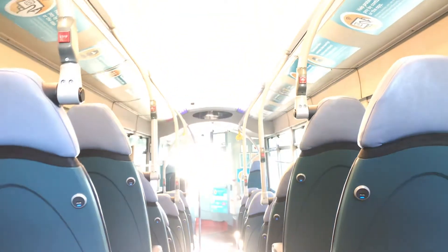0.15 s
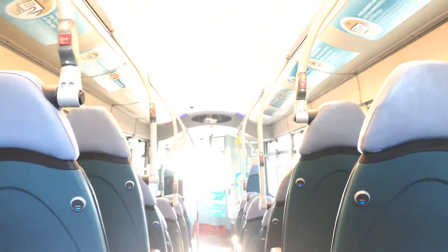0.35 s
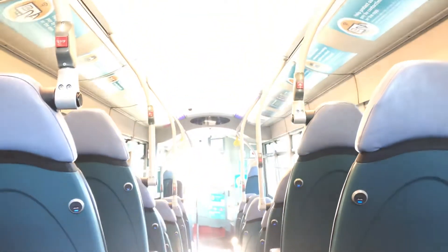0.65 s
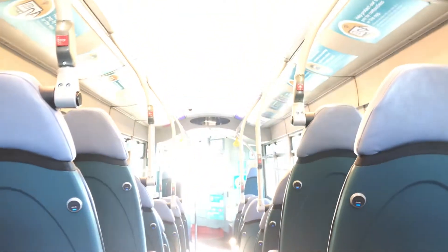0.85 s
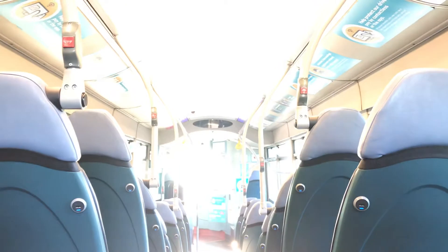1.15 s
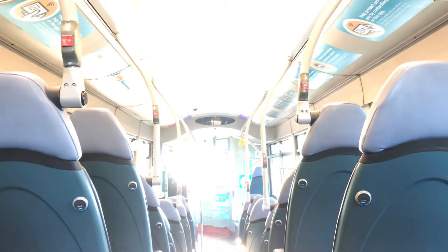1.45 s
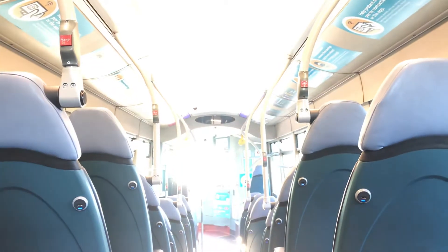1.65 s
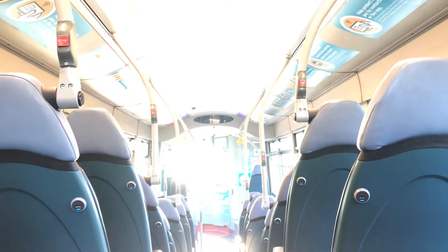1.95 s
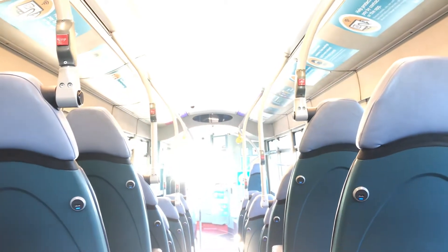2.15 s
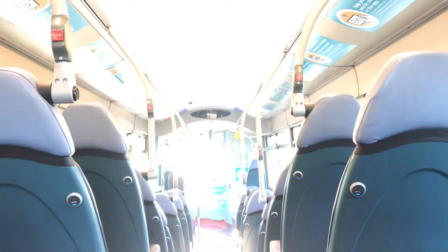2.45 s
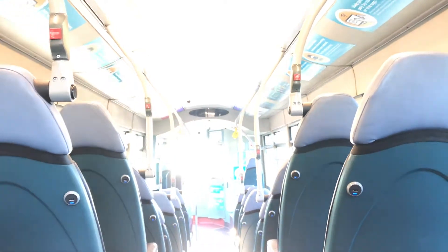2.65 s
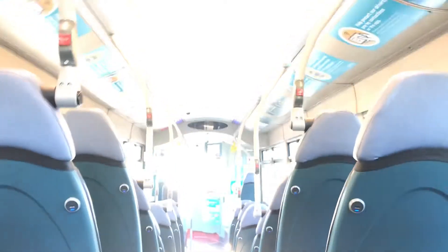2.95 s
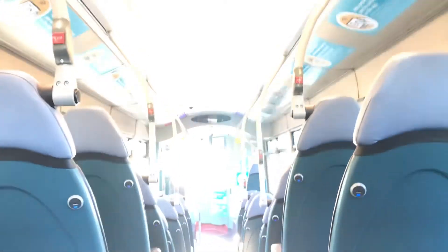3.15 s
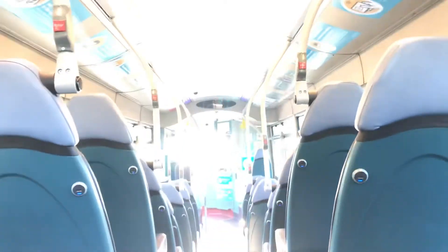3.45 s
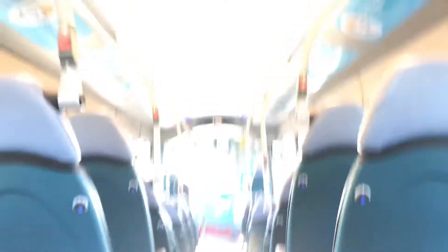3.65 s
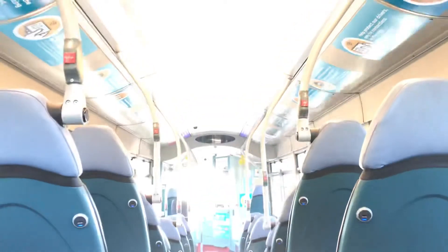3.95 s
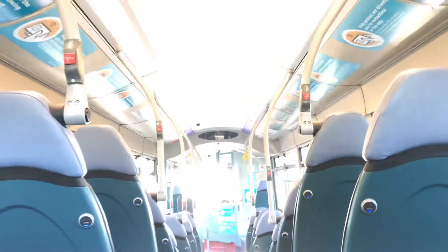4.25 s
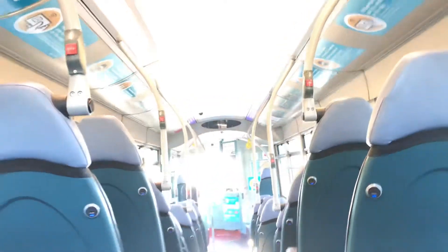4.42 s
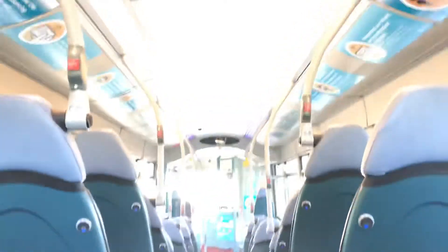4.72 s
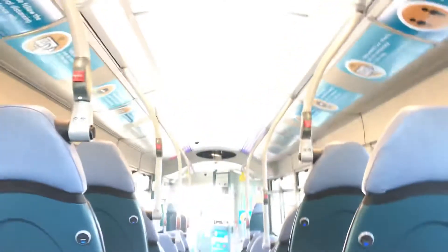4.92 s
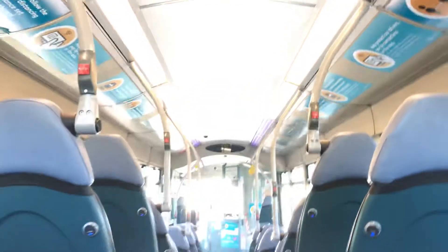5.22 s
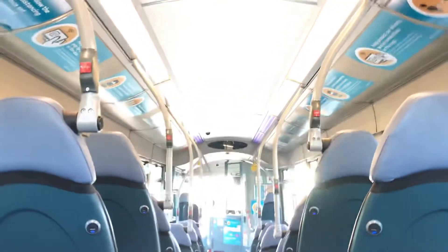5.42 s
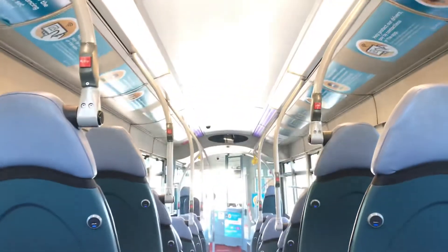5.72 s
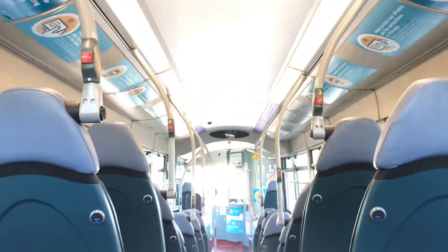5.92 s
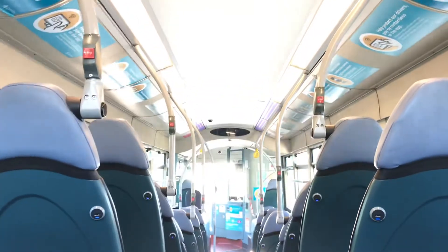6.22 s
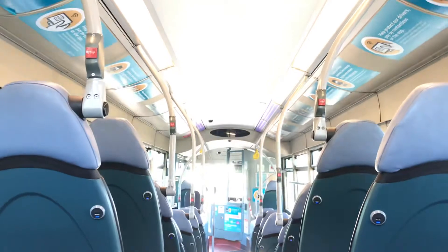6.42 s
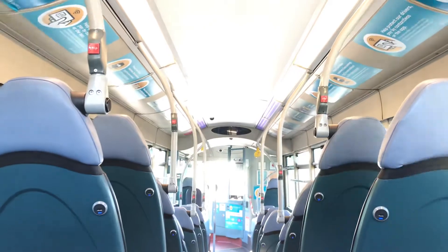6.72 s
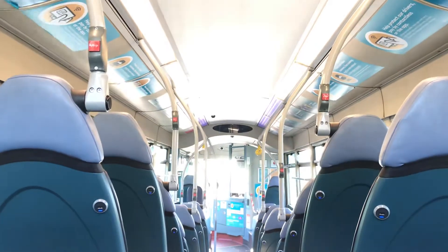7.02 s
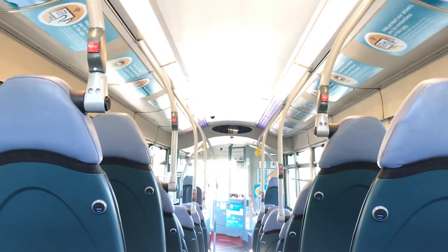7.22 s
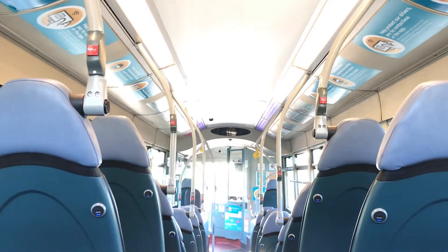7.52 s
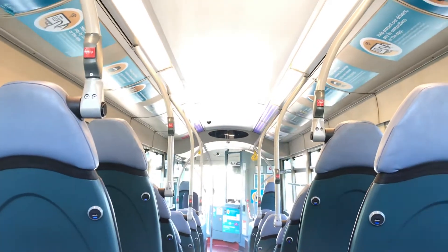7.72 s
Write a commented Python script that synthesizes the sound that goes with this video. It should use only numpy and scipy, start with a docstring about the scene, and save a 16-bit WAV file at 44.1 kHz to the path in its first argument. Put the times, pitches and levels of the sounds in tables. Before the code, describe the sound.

Heard from a seat near the rear of a bus cabin, a six-cylinder diesel eases down while its fluttering turbo whistle falls. Around two and a half seconds a bump thuds, fittings clack and a short squeak sounds. Then the engine takes load, the whistle soars into the high treble, and rushing air and thin singing tones join the drone and road rumble until the end.

```python
"""City bus pulling away

One microphone at a seat inside, near the rear; its chain cuts the treble just below 16 kHz.
The six-cylinder diesel coasts down, then pulls away under load: boom, knocks, hums and clatter follow its firing.
The turbocharger winds down and spools up; its speed sets the whistle, the blade tone, the rush of air
and two small gaps that sing under boost. Gear teeth whine in spells, shaped noise makes the road rumble,
and cabin fittings rattle, as noisy ticks and rings, over a few bumps."""
import sys
import numpy as np
from scipy import signal
from scipy.fft import rfft, irfft, next_fast_len
from scipy.io import wavfile
from scipy.ndimage import uniform_filter1d

SR = 44100
rng = np.random.default_rng(int(sys.argv[2]) if len(sys.argv) > 2 else 0)


def pcm_store(signal):
    """Save signal as 16-bit PCM."""
    levels = np.round(np.clip(np.atleast_2d(signal), -1, 1) * 32767)
    wavfile.write(sys.argv[1], SR, levels.astype(np.int16).T)


N = 347067
TIME = np.arange(N) / SR

# engine speed: (time [s], firing rate [Hz])
ENGINE_SPEED = [(0, 60.13), (0.5, 59.93), (1.3, 57.42), (2, 53.71), (2.8, 51.7), (4, 52.15), (4.6, 53.72),
                (5.5, 55.71), (6.5, 60.1), (7.3, 62.91), (7.87, 64.1)]
# how hard the engine works: (time [s], effort [dB])
ENGINE_EFFORT = [(0, 0), (1.7, -3.5), (2.3, -1), (2.58, 1.5), (2.78, 0.5), (2.97, 1), (3.8, 1.6), (4.6, 4),
                 (5.2, 0.5), (6.2, 0), (7.87, 0.5)]
# cabin boom at the firing rate: (time [s], level before the trim in engine() [dB])
BOOM_LEVEL = [(0, -21), (0.6, -33.5), (1.6, -55), (2.65, -34), (2.95, -19.5), (3.6, -28), (4.28, -21.5),
              (4.38, -16), (4.55, -20.5), (5.05, -17.5), (5.8, -15), (6.6, -16.5), (7.35, -13.5),
              (7.87, -18.5)]
# a pump driven by the engine takes up load and throbs, then slowly eases:
# (time [s], level before the trim in engine() [dB])
PUMP_LOADS = [(0, -19.5), (6.75, -21)]
PUMP_RISE_S, PUMP_T60_S, PUMP_FLOOR_DB = 0.077, 9.7, -38.5
# the six cylinders: (relative knock strength [dB])
CYLINDER_STRENGTH = [-2.5, -3.5, 0, -4, -2.5, -4]
# colour of the knocks in floor and body panels: (frequency [Hz], relative level [dB])
DRONE_COLOUR = [(50, -18), (75, -11.5), (100, -1), (122, -2.5), (136, -11), (160, 5), (190, -3.5),
                (235, -5.5), (295, -3), (350, -10.5), (450, -13.5), (600, -46.5), (1000, -52), (2000, -51)]
# colour of combustion and valve noise: (frequency [Hz], relative level [dB])
CLATTER_COLOUR = [(200, -19), (400, 3), (620, 1), (850, 3), (1100, -2.5), (1700, -2.5), (2100, -7),
                  (3200, -10), (4500, -15.5), (6500, -21.5), (8500, -35), (16000, -32)]
# levels at zero effort; the drone gains DRONE_PER_EFFORT dB per dB of effort
DRONE_DB, DRONE_PER_EFFORT, CLATTER_DB = -29.5, 0.71, -38
# engine orders that hum in the cabin:
# (time [s], half length [s], multiple of the crank rate [-], level [dB])
HUMS = [(1.099, 0.49, 11.25, -37.5), (3.699, 0.51, 9.5, -33), (3.698, 0.42, 10.5, -36),
        (4.9, 0.25, 10.5, -33), (5.7, 0.23, 10.5, -35), (5.4, .3, 12.5, -38.5), (6.2, 0.253, 8, -34),
        (7.45, 0.38, 8, -31.5), (7.498, 0.56, 9, -34), (7.495, .45, 16, -37.5)]

# turbo speed: (time [s], blade-passing rate [Hz])
TURBO_SPEED = [(0, 4096), (.3, 3720), (.65, 3317), (1, 3150), (1.5, 2810), (2.75, 3170), (2.9, 3304),
               (3.1, 4190), (3.5, 5560), (4, 7204), (4.5, 8640), (5, 9740), (5.5, 10390), (5.95, 11100),
               (6.4, 11470), (6.85, 11680), (7.1, 11590), (7.4, 11380), (7.65, 10850), (7.86, 10270)]
FULL_BOOST_HZ = 11700  # blade-passing rate
# states of the flow through the compressor, from easing off and stalling to pulling hard and unloading:
# (start [s], change-over [s], whistle pitch as a share of the blade rate [-], whistle [dB],
#  pitch unsteadiness as a share [-], undertone [dB], overtones [dB], breath [dB], slower cell [dB],
#  pull of the duct [0-1], throb [0-1], rush of air [dB]); levels relative
FLOW_STATES = [(0, .01, 0.82, 3, .03, -10, -18, -12, 0, 0.31, 0.3, 2),
               (.18, .12, 0.8, 0, .036, -14, -13, -4, -3, 0.16, 0.24, 1),
               (.56, .04, 0.82, 0.5, .022, -14, -27, -9, 4, 0.04, 0.3, -1.5),
               (.73, 0.029, 0.79, -0.5, .012, -11, -31, -14, -14, 0.03, 0.87, 1),
               (1, .05, 0.75, 0, 0.032, -12, -18, -4, -6, 0, 0.47, 0),
               (1.17, .2, 0.71, -8, .04, -14, -18, 0, -6, 0.03, 0.02, 3),
               (2.8, .06, 0.78, 2, .008, -12, -20, -14, -18, 0.04, .2, 0),
               (2.91, .02, 0.78, 3.5, 0.027, -18, -18, 4, -9, .3, 0.3, 0),
               (3, 0.066, .805, 4.5, 0.022, -20, -24, -12, -10, 0.7, 0.25, 0),
               (3.17, .06, 0.81, 2, 0.0157, -19, -15, -15, -12, .8, 0.13, 1),
               (3.42, 0.054, .8, -1.5, 0.0162, -16, -10.5, -12, -9, 0.7, 0.12, 4),
               (3.9, .15, .798, 3, 0.017, -18, -22, -25, -14, .6, 0.16, 6),
               (4.38, 0.072, 0.8, 2, 0.0125, -13, -22, -21, -16, .5, 0.23, 4),
               (4.76, 0.043, .797, 6.5, 0.0095, -20, -22, -28, -22, 0.6, 0.17, 0),
               (4.88, 0.117, 0.79, 0, .014, -14, -21, -22, -15, 0.87, 0.23, -2),
               (5.06, 0.12, 0.79, -3.5, .022, -15, -11, 0, -8, .5, 0.1, 2),
               (5.24, .15, .803, -2.5, 0.037, -14, -12, 3, -9, 0.36, 0.08, 3),
               (5.535, 0.0075, 0.81, 0, 0.0057, -16, -25, -24, -24, .8, 0.23, -3.5),
               (5.88, 0.031, 0.77, -11, .011, -7, -13, -13, -24, 0.02, 0.22, -4),
               (6.03, 0.15, 0.78, -5.5, 0.0085, -8.5, -17, -8, -22, 0, .12, -2.5),
               (7.36, 0.23, 0.78, -8, 0.0076, -12, -20, -17, -23, 0.03, .2, -4)]
# overtones of the whistle: (multiple of its pitch [-], relative level [dB])
WHISTLE_PARTIALS = [(1.5, 2), (2, 0), (2.5, -8)]
# base levels at full boost, to which the flow state adds; both fall at lower turbo speed
WHISTLE_DB, WHISTLE_DB_PER_OCTAVE = -33, 10
AIR_DB, AIR_DB_PER_OCTAVE = -46.5, 7.5
MUFFLE_HZ, MUFFLE_DB_PER_OCTAVE = 13500, 28  # the engine cover holds back the highest overtones
DUCT_SPACING_HZ = 340  # between the resonances of the intake duct
# the intake duct passes the blade tone best near one resonance:
# (blade rate [Hz], level before the trim in turbocharger() [dB])
BLADE_DUCT = [(8500, -82), (9700, -55), (10450, -58), (10850, -55), (11080, -39.5), (11450, -50),
              (11700, -46)]
# two gaps that sing under boost, swelling in turn: (time [s], level [dB])
LOW_LEAK_LEVEL = [(5.2, -56), (5.8, -53.5), (6.3, -53.5), (6.55, -45), (6.8, -46), (7.1, -44.5),
                  (7.27, -46.5), (7.38, -51), (7.46, -44.5), (7.6, -57), (7.87, -52)]
HIGH_LEAK_LEVEL = [(4.5, -51), (4.9, -50.5), (5.55, -47.5), (5.83, -50), (6, -48.5), (6.35, -42),
                   (6.68, -54), (6.87, -45), (7.25, -42.5), (7.38, -51), (7.53, -45.5), (7.87, -43)]
# their partials at full boost: (frequency [Hz], relative level [dB])
LOW_LEAK_PARTIALS = [(1436, -4), (2872, -0.5), (5744, -12)]
HIGH_LEAK_PARTIALS = [(1631, -5), (3262, -2.5), (6524, -18)]
LOW_LEAK_SAG, HIGH_LEAK_SAG = .28, .1  # octaves of pitch lost per octave of turbo speed gained
BOOST_LAG_S = 0.15  # pressure at the gaps follows the wheel this much later
# air seeps through the gaps as a narrow hiss: (time [s], half length [s], frequency [Hz], level [dB])
SEEPS = [(3.3, .18, 6330, -53), (3.953, 0.47, 6920, -53)]
SEEP_RATE_HZ = 660  # how fast the seeping air wavers, which sets the width of its hiss
# colour of the rush of air: (frequency [Hz], relative level [dB])
AIR_COLOUR = [(1500, 10), (4000, 8), (7000, 9.5), (9500, 6), (10500, 4), (12000, 6), (16000, -14)]
# brief swells of hiss: (time [s], half length [s], level [dB])
HISS_SWELLS = [(2.119, 0.11, -53), (2.985, 0.06, -48), (3.274, 0.048, -47), (3.464, 0.028, -44),
               (7.249, .08, -49)]
# colour of a short puff of released air: (frequency [Hz], relative level [dB])
PUFF_COLOUR = [(1200, 2), (2000, -3), (2400, 0), (2950, 4), (3400, -12), (4700, -13), (6800, -16),
               (8000, -33), (16000, -40)]
PUFF_S, PUFF_DB, PUFF_RISE_S, PUFF_T60_S = 1.06, -40, 0.016, 1.5

# spells of transmission whine:
# (start [s], length [s], first pitch [Hz], last pitch [Hz], level before fades [dB])
GEAR_SPELLS = [(0, 0.53, 842, 823, -45.5), (1.468, 0.98, 894, 826, -43), (2.478, .27, 845, 880, -40),
               (3.298, 0.2, 835, 843, -38), (4.202, 1.05, 837, 889, -45.5), (5.75, 0.45, 850, 872, -46)]
GEAR_FADE_S = 0.14

# rattling fittings: (time [s], tick peak before the trim in scene() [dB], ring decay by 60 dB [s],
#  ring level relative to the tick, before tail_db [dB])
RATTLES = [(1.789, -41.5, 0.34, 5), (1.8118, -39, 0.29, -5), (1.944, -50, .08, -2), (2.326, -40, .2, -1),
           (2.332, -20, 0.4, -7.5), (2.4158, -24, 0.66, -8), (2.5893, -30, 0.14, -2),
           (2.669, -35, 0.39, -1.5), (3.112, -34.5, 0.24, -6), (3.2153, -43, 0.27, 8),
           (3.2594, -39, 0.15, 0), (3.332, -29.5, 0.1, 2), (3.3375, -25.5, 0.18, -5.5),
           (3.38, -35, 0.25, -5), (3.491, -34, 0.095, -5), (3.497, -33, 0.11, -7),
           (4.225, -44.5, 0.23, -13), (4.609, -49, .08, 19), (4.68, -50, .08, 20)]
# colour of their ring: (frequency [Hz], relative level [dB])
RATTLE_COLOUR = [(400, -22), (1200, 15), (3000, 15.5), (5500, 6.5), (8500, 11), (10500, 7), (13000, 4),
                 (16000, -15)]
# a fitting squeaks after the loudest knocks
SQUEAK_S, SQUEAK_HZ, SQUEAK_DB, SQUEAK_RISE_S, SQUEAK_T60_S = 2.505, 4000, -38, .01, 0.12

# rough patches swell the road rumble: (time [s], half length [s], level [dB])
BUMPS = [(1.299, 0.15, -31), (2.597, 0.13, -24), (2.999, 0.11, -23.5), (3.75, 0.28, -23.5),
         (4.399, 0.43, -25.5), (5.993, 0.13, -25), (6.903, 0.49, -24)]
ROAD_DB = -25.5
# colour of the road rumble: (frequency [Hz], relative level [dB])
ROAD_COLOUR = [(15, -32), (28, 0), (40, 3), (55, 7), (75, 3.5), (110, -8.5), (140, -9), (200, -8.5),
               (320, -14.5), (500, -27), (1000, -29.5), (2500, -81)]
# one bump also thuds through the body panels: (frequency [Hz], relative level [dB])
THUD_COLOUR = [(150, -27), (330, 7), (550, -1), (900, -26), (3000, -34)]
THUD_S, THUD_DB, THUD_RISE_S, THUD_T60_S = 2.56, -28, 0.014, 0.5

CABIN_T60_S = 0.17
TOP_HZ = 15850  # upper limit of the microphone chain


def engine(phase):
    """Firing drives boom, body panels, hums and clatter; effort sets the level of panels and clatter."""
    effort_db = curves(ENGINE_EFFORT)[0]
    low = undb(1.0) * boom(phase)
    panels = undb(DRONE_DB + DRONE_PER_EFFORT * effort_db) * drone(phase, scatter_db=2.0, loose=0.95)
    valves = undb(CLATTER_DB + effort_db) * clatter(phase, depth=0.056)
    return low + panels + hums(phase) + valves


def boom(phase):
    """The cabin air swings at the firing rate; a pump geared to the engine adds a lower, throbbing line."""
    firing = undb(curves(BOOM_LEVEL)[0] + 0.72 * walk(4.8)) * np.sin(phase)
    loads = sum(undb(db) * burst(s, PUMP_RISE_S, PUMP_T60_S) for s, db in PUMP_LOADS)
    pump_gain = np.hypot(undb(PUMP_FLOOR_DB), loads)
    pump = pump_gain * undb(1.2 * walk(8)) * np.sin(phase * (3 / 4))
    return np.sqrt(2) * (firing + pump)


def drone(phase, scatter_db, loose):
    """One knock per firing, each cylinder with its own strength, rings the floor and body panels."""
    firings = np.flatnonzero(np.diff(phase // (2 * np.pi)))
    size = 2048  # samples per knock
    scatter = scatter_db * rng.standard_normal(len(firings))
    strength = undb(np.resize(CYLINDER_STRENGTH, len(firings)) + scatter)
    # each cylinder reaches the body by a path of its own; loose panels change it from knock to knock
    paths = rng.standard_normal((len(CYLINDER_STRENGTH), size))
    knocks = paths[np.arange(len(firings)) % len(paths)]
    knocks = knocks + loose * rng.standard_normal((len(firings), size))
    knocks = knocks * np.exp(-TIME[:size] / 0.017)
    body = np.zeros(N + size)
    for i, knock, gain in zip(firings, knocks, strength):
        body[i:i + size] += gain * knock
    return colour(body[:N], DRONE_COLOUR)


def hums(phase):
    """Single engine orders swell and fade as they sweep through resonances of the cabin."""
    crank = phase / (len(CYLINDER_STRENGTH) / 2)  # each cylinder fires every second turn
    out = 0
    for s, half, order, db in HUMS:
        out = out + bell(s, half) * undb(db + 2.0 * walk(18)) * np.sin(order * crank)
    return np.sqrt(2) * out


def clatter(phase, depth):
    """Combustion and valve noise, swelling once per firing."""
    swelling = 1 + depth * np.cos(phase)
    return colour(noise() * swelling * undb(0.88 * walk(30)), CLATTER_COLOUR)


def turbocharger(engine_phase):
    """Whistle, blade tone, singing gaps and rush of air follow the wheel; a puff is released once."""
    blade_hz = curves(TURBO_SPEED)[0]
    *flow, rush_db = states(FLOW_STATES)
    cells = whistle(blade_hz, flow, engine_phase, flutter_rate=900, drift=.55, surge=0.027,
                    breath_rate=1940, strand_ratio=0.95, strand_unsteady=0.0141, blur=.7,
                    under_throb=1.1, wet=0.46)
    blade_db = np.interp(blade_hz, *np.transpose(BLADE_DUCT))
    blades = tone(blade_hz, blade_db, unsteady=0.00236, rate=240.0)
    gaps = leaks(blade_hz, unsteady=0.001525, shrill_db=26)
    air = rush_of_air(blade_hz, rush_db)
    return undb(2.0) * cells + undb(1.5) * cabin(blades, wet=0.8) + gaps + seeping_air() + air + puff()


def whistle(blade_hz, flow, engine_phase, flutter_rate, drift, surge, breath_rate, strand_ratio,
            strand_unsteady, blur, under_throb, wet):
    """Air cells circling the compressor wheel: a tone that splits and frays into hiss in unsteady flow."""
    share, flow_db, unsteady, under_db, over_db, breath_db, strand_db, pull, throb = flow
    # the pitch clings to each resonance of the duct, then hops to the next
    free = 2 * np.pi * share * blade_hz / DUCT_SPACING_HZ
    hz = (free - pull * np.sin(free)) * DUCT_SPACING_HZ / (2 * np.pi)
    # every second firing tugs at the pitch
    hz = hz * (1 + surge * throb * np.cos(engine_phase / 2))
    flutter = 0.664 * walk(flutter_rate) + drift * walk(72.6)
    phase = turn(hz * (1 + unsteady * flutter))
    # the overtones are more ragged than the tone itself
    ragged = phase + turn(hz * blur * unsteady * walk(flutter_rate))
    overtones = 0
    for multiple, db in WHISTLE_PARTIALS:
        muffled_db = db - MUFFLE_DB_PER_OCTAVE * below(MUFFLE_HZ, multiple * hz)
        overtones = overtones + undb(muffled_db) * np.sin(multiple * ragged)
    voice = np.sin(phase) + undb(over_db + 2.2 * walk(20)) * overtones
    # a slightly slower cell comes and goes beside the main one; both have an undertone an octave down
    slow = turn(strand_ratio * hz * (1 + strand_unsteady * walk(flutter_rate)))
    voice = voice + undb(strand_db + 2.8 * walk(32)) * np.sin(slow)
    # the undertone of the slower cell grows with turbulence
    main_under = undb(under_db) * np.sin(phase / 2)
    slow_under = undb(strand_db + breath_db - 2.5) * np.sin(slow / 2)
    under = undb(2.4 * walk(68)) * (main_under + slow_under)
    # turbulence takes power from the tone and spreads it as a breathy skirt
    breath = undb(breath_db)
    voice = voice + breath * walk(breath_rate) * np.sin(phase)
    level_db = WHISTLE_DB + flow_db - WHISTLE_DB_PER_OCTAVE * below(blade_hz, FULL_BOOST_HZ)
    gain = np.sqrt(2) * undb(level_db + 0.83 * walk(19))
    gain = gain / np.sqrt(1 + breath ** 2 + undb(strand_db) ** 2)

    def chop(depth):
        """Every second firing swells the sound into bursts, at constant mean power."""
        return (1 + depth * np.sin(engine_phase / 2)) / np.sqrt(1 + depth ** 2 / 2)

    # the undertone is chopped most deeply
    return cabin(gain * voice, wet) * chop(throb) + cabin(gain * under, wet) * chop(under_throb * throb)


def leaks(blade_hz, unsteady, shrill_db):
    """Boost air sings in two narrow gaps; as pressure builds, their pitch sags and their tone mellows."""
    slack = below(np.interp(TIME - BOOST_LAG_S, TIME, blade_hz), FULL_BOOST_HZ)  # octaves short of boost
    gaps = ((LOW_LEAK_LEVEL, LOW_LEAK_PARTIALS, LOW_LEAK_SAG),
            (HIGH_LEAK_LEVEL, HIGH_LEAK_PARTIALS, HIGH_LEAK_SAG))
    out = 0
    for level, partials, sag in gaps:
        opened = np.clip((TIME - level[0][0]) / .1, 0, 1) * undb(curves(level)[0])
        phase = turn(2 ** (sag * slack) * (1 + unsteady * walk(96)))  # for a partial of 1 Hz
        for hz, db in partials:
            # slack pressure favours the partials above the second
            tilt_db = shrill_db * np.minimum(slack, 1) * np.log2(hz / partials[1][0])
            out = out + opened * undb(db + tilt_db + 1.4 * walk(9)) * np.sin(hz * phase)
    return np.sqrt(2) * out


def seeping_air():
    """Air seeps through the gaps before they sing: a tone wavering so fast that it is a narrow hiss."""
    out = 0
    for s, half, hz, db in SEEPS:
        carrier = tone(hz, 0, unsteady=0.011, rate=23)
        out = out + undb(db) * bell(s, half) * walk(SEEP_RATE_HZ) * carrier
    return out


def rush_of_air(blade_hz, rush_db):
    """Broad turbulent hiss that grows with turbo speed, with brief swells."""
    air_db = AIR_DB + rush_db - AIR_DB_PER_OCTAVE * below(blade_hz, FULL_BOOST_HZ)
    return swells(air_db, HISS_SWELLS) * undb(1.0 * walk(14.0)) * colour(noise(), AIR_COLOUR)


def puff():
    """A short puff of released air: coloured noise that builds fast and dies away."""
    return undb(PUFF_DB) * burst(PUFF_S, PUFF_RISE_S, PUFF_T60_S) * colour(noise(), PUFF_COLOUR)


def gears():
    """Gear teeth sing in short spells, each gliding with the shaft."""
    out = 0
    for s, length, start_hz, end_hz, db in GEAR_SPELLS:
        hz = np.interp(TIME, [s, s + length], [start_hz, end_hz])
        gate = np.clip(np.minimum(TIME - s, s + length - TIME) / GEAR_FADE_S, 0, 1)
        out = out + gate * tone(hz, db, unsteady=0.0173, rate=121)
    return out * undb(0.96 * walk(4.4))


def rattles(tick_s, rise_s, tail_db):
    """Loose fittings knock: contact builds to a tick, then a noisy ring dies away in the cabin."""
    ticks, rings = np.zeros(N), np.zeros(N)
    for s, db, t60, body_db in RATTLES:
        near = slice(int((s - .03) * SR), int((s + .5) * SR))
        t = TIME[near] - s
        build, since = np.exp(np.minimum(t, 0) / rise_s), np.maximum(t, 0)
        ticks[near] += undb(db) * build * np.exp(-since / tick_s)
        rings[near] += undb(db + body_db + tail_db) * build * np.exp(-np.log(1000) * since / t60)
    tick_noise = colour(noise(), [(2000, -24), (8000, -8), (14000, 4)])  # (frequency [Hz], level [dB])
    return ticks * tick_noise + rings * colour(noise(), RATTLE_COLOUR)


def squeak():
    """A rubbing fitting gives one short, unsteady tone."""
    envelope = burst(SQUEAK_S, SQUEAK_RISE_S, SQUEAK_T60_S)
    return cabin(envelope * tone(SQUEAK_HZ, SQUEAK_DB, unsteady=0.018, rate=500), wet=0.33)


def road():
    """Road rumble as low coloured noise, swelling over rough patches, with one thud of the body panels."""
    rumble = swells(ROAD_DB, BUMPS) * colour(noise(), ROAD_COLOUR)
    thud = undb(THUD_DB) * burst(THUD_S, THUD_RISE_S, THUD_T60_S) * colour(noise(), THUD_COLOUR)
    return rumble + thud


def cabin(x, wet):
    """Direct sound plus dense reflections from windows, seats and roof; wet is their share of power."""
    t = TIME[:SR // 2]
    tail = noise()[:len(t)] * np.exp(-np.log(1000) * t / CABIN_T60_S)
    reflections = signal.fftconvolve(x, tail / np.linalg.norm(tail))[:N]
    return np.sqrt(1 - wet) * x + np.sqrt(wet) * reflections


def tone(hz, db, unsteady, rate):
    """A tone from rotating teeth, blades, a rubbing part or air, slightly unsteady in pitch."""
    return np.sqrt(2) * undb(db) * np.sin(turn(hz * (1 + unsteady * walk(rate))))


def turn(hz):
    """Phase in radians of something that turns at hz."""
    return 2 * np.pi * np.cumsum(hz) / SR


def noise():
    """White noise."""
    return rng.standard_normal(N)


def walk(rate):
    """Smooth chance that changes about rate times a second; rms 1."""
    k = max(int(SR / rate), 1)
    return unit(uniform_filter1d(uniform_filter1d(noise(), k), k))


def colour(x, points):
    """Filter by an outline of (frequency [Hz], level [dB]); rms 1."""
    hz, db = np.transpose(points)
    size = next_fast_len(N + 8192)
    bins = np.maximum(np.fft.rfftfreq(size, 1 / SR), 1)
    gain = undb(np.interp(np.log(bins), np.log(hz), db))
    return unit(irfft(rfft(x, size) * gain, size)[:N])


def burst(s, rise_s, t60):
    """Envelope that builds up to time s, then dies away by 60 dB in t60 seconds."""
    t = TIME - s
    return np.exp(np.minimum(t, 0) / rise_s - np.log(1000) * np.maximum(t, 0) / t60)


def bell(s, half):
    """Bell-shaped envelope centred on time s."""
    return np.exp(-((TIME - s) / half) ** 2 / 2)


def swells(steady_db, table):
    """Gain of a steady level with bell-shaped swells of power on top."""
    power = sum(undb(db) ** 2 * np.exp(-((TIME - s) / half) ** 2) for s, half, db in table)
    return np.sqrt(undb(steady_db) ** 2 + power)


def curves(table):
    """Each column of a table, joined by straight lines in time."""
    s, *columns = np.transpose(table)
    return [np.interp(TIME, s, c) for c in columns]


def states(table):
    """Each setting of a table of states: held until the next state takes over."""
    now = np.array(table[0][2:])[:, None]
    for s, change_s, *settings in table[1:]:
        taken_over = np.clip((TIME - s) / change_s, 0, 1)
        now = now + taken_over * (np.array(settings)[:, None] - now)
    return now


def below(hz, knee_hz):
    """Octaves by which a frequency lies under a knee; 0 above it."""
    return np.maximum(np.log2(knee_hz / hz), 0)


def undb(db):
    """Decibels to gain."""
    return 10 ** (np.asarray(db) / 20)


def unit(x):
    """Scale to rms 1."""
    return x / np.sqrt(np.mean(x ** 2))


def scene():
    """Engine, turbo, gears, fittings and road as heard from one seat."""
    firing_phase = turn(curves(ENGINE_SPEED)[0] * (1 + 0.0027 * walk(12.1)))
    machinery = engine(firing_phase) + turbocharger(firing_phase) + gears()
    fittings = undb(-4.0) * rattles(tick_s=0.0026, rise_s=0.0011, tail_db=-2.5) + squeak()
    return (machinery + fittings + road())[None]


def record(dry):
    """The microphone chain cuts the top of the treble."""
    return signal.sosfilt(signal.ellip(10, .2, 80, TOP_HZ, fs=SR, output="sos"), dry)


dry = scene()
out = record(dry)
pcm_store(out)
```